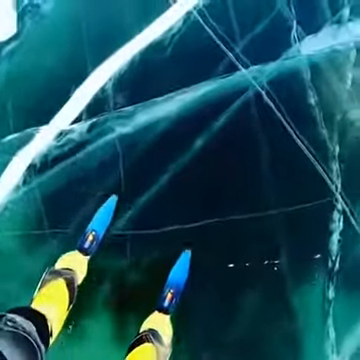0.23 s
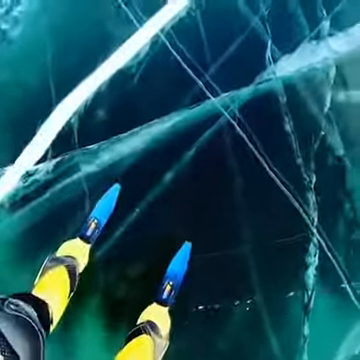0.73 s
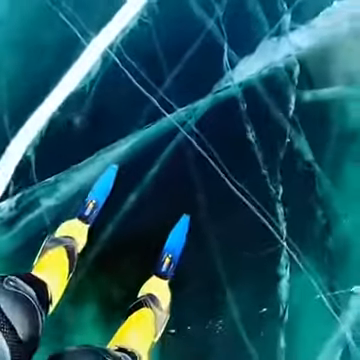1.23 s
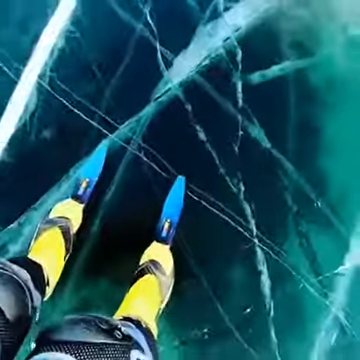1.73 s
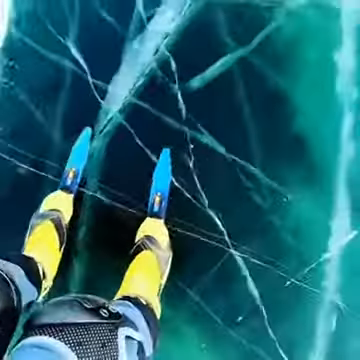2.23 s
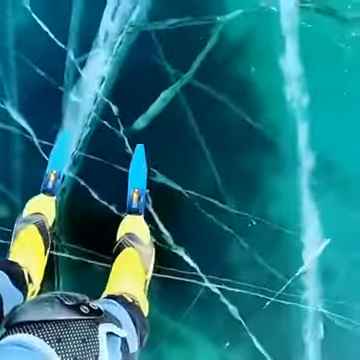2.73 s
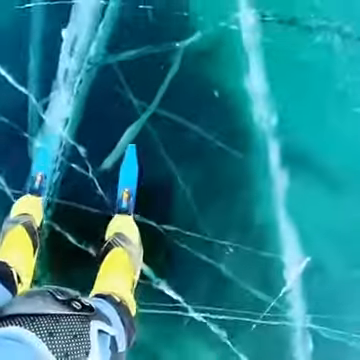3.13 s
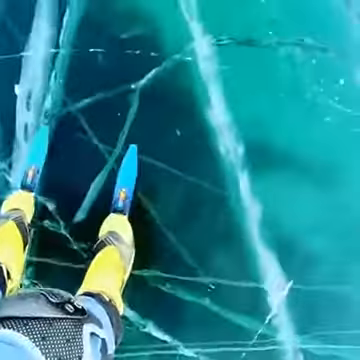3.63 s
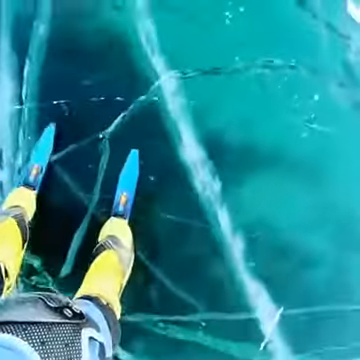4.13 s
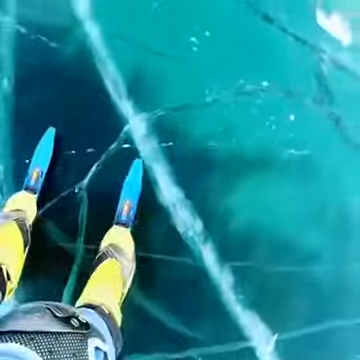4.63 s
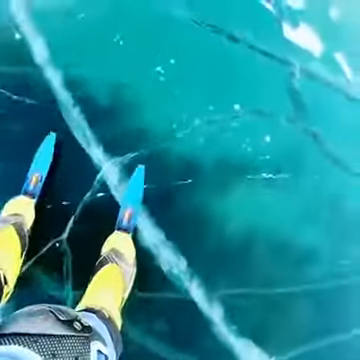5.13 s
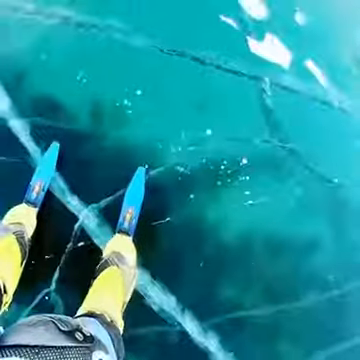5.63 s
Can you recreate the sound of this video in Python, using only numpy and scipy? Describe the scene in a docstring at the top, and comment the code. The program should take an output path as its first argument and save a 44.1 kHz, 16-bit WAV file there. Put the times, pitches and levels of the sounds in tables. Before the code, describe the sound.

Skate blades glide softly over clear lake ice as small cracks tick, then big sharp fractures burst with dull rushes and deep falling booms.

```python
"""Clear lake ice cracks under a skater who glides over it, slowly losing speed.
Each fracture arrives twice: as a dull rush through the ice sheet, then as a sharp crackle through the air.
The farther off it is, the earlier, duller and longer the rush; filtered noise and clicks make both.
Bending waves spread out in the sheet and arrive as falling tones, made by sweeping sines.
Noise makes the blades' hiss and rumble and the air at the microphone; bright, short cracks tick."""
import sys
import numpy as np
from scipy import signal
from scipy.fft import rfft, irfft, next_fast_len
from scipy.io import wavfile

SR = 44100
rng = np.random.default_rng(int(sys.argv[2]) if len(sys.argv) > 2 else 0)


def pcm_store(signal):
    """Save signal as 16-bit PCM."""
    levels = np.round(np.clip(np.atleast_2d(signal), -1, 1) * 32767)
    wavfile.write(sys.argv[1], SR, levels.astype(np.int16).T)


N = 258867  # samples
T = np.arange(N) / SR  # time in seconds


def from_db(db):
    """Level law: 20 dB is a factor of ten in amplitude."""
    return 10 ** (np.asarray(db) / 20)


def rms_one(x):
    """Normalization: scale to unit mean power."""
    return x / np.sqrt(np.mean(x ** 2) + 1e-20)


def at_hz(points, hz):
    """Logarithmic pitch scale: interpolate a table over the log of frequency."""
    table_hz, values = np.array(points).T
    return np.interp(np.log(hz + 1e-3), np.log(table_hz), values)


def panned(pan_db):
    """Level difference between channels: gains for left and right, positive toward the left."""
    return from_db(np.array([[.5], [-.5]]) * pan_db)


def stereo_noise(alike, size=N):
    """Partial coherence: a shared and an opposed white noise set how alike the channels are."""
    mid, side = rng.standard_normal((2, size))
    alike = np.clip(alike, -1, 1)
    opposed = side * [[1], [-1]]
    return (np.sqrt(1 + alike) * mid + np.sqrt(1 - alike) * opposed) / np.sqrt(2)


def coloured(x, spectrum):
    """Spectral shaping: give white sound a smooth spectrum and keep its power."""
    size = next_fast_len(N + 4096)
    hz = np.arange(size // 2 + 1) * SR / size
    gain = rms_one(from_db(at_hz(spectrum, hz)))
    return irfft(rfft(x, size) * gain, size)[..., :N]


def uneven(x, ripple_db, spacing_hz):
    """Interference: random narrow peaks and dips, as short paths in the ice add up and cancel."""
    length = x.shape[-1]
    size = next_fast_len(length + 2048)
    place = np.arange(size // 2 + 1) * SR / size / spacing_hz
    heights = np.clip(rng.standard_normal(2000), -1.7, 1.7)
    ripple = np.interp(place, np.arange(2000), heights)
    gain = rms_one(from_db(ripple_db * ripple))
    return irfft(rfft(x, size) * gain, size)[..., :length]


def drift(rate):
    """Slow random modulation: about rate new values a second, joined by lines, unit power."""
    return rms_one(np.interp(T * rate, np.arange(N), rng.standard_normal(N)))


def filtered(x, hz, kind, order=2):
    """Butterworth filtering: a maximally flat pass band."""
    sos = signal.butter(order, np.clip(hz, 10, .45 * SR), kind, fs=SR, output="sos")
    return signal.sosfilt(sos, x)


def echoed(x, delay_s, echo_db):
    """Reflection: add one delayed copy."""
    delayed = np.array([np.interp(T - delay_s, T, side, left=0) for side in x])
    return x + from_db(echo_db) * delayed


def splinters(per_s, size_db):
    """Impulsive noise: sparse clicks of uneven size and either sign, with unit power."""
    signs = rng.choice([-1, 1], N)
    sizes = from_db(size_db * np.minimum(rng.exponential(1, N), 3))
    return rms_one(sizes * signs * (rng.random(N) < per_s / SR))


# Spectrum of the air at the microphone. Each row: frequency in Hz, relative density in dB per Hz.
WIND_SPECTRUM = [(15, 4), (30, 8), (50, -1.5), (90, -4.5), (160, -21), (400, -35)]


def wind(start_db=-45.0, fall_db_per_s=2.02, pan_db=0.94):
    """Turbulence: the air of the glide buffets the microphone, less as the glide slows."""
    level = from_db(start_db - fall_db_per_s * T)
    return level * panned(pan_db) * coloured(stereo_noise(1.0), WIND_SPECTRUM)


# Spectrum of the rumbling ice. Each row: frequency in Hz, relative density in dB per Hz.
RUMBLE_SPECTRUM = [(60, 4.5), (130, 6.5), (220, 3), (380, 4), (550, -2.5), (800, -10.5), (1200, -22.5),
                   (2500, -44)]


def blade_rumble(start_db=-53.0, fall_db_per_s=0.73):
    """Forced vibration: the blades set the ice rumbling, less as the glide slows."""
    level = from_db(start_db - fall_db_per_s * T)
    return level * coloured(stereo_noise(0.45), RUMBLE_SPECTRUM)


# Spectrum of the shaved grit. Each row: frequency in Hz, relative density in dB per Hz.
HISS_SPECTRUM = [(700, -25), (1200, -3.5), (2000, -1), (3200, 0.5), (5500, -4), (8000, -3), (10500, -4.5),
                 (12000, -2.5), (13500, -57)]
# Hiss before and after the big fractures. Each row: time in seconds, relative level in dB.
HISS_BEFORE = [(0.0, -57.5), (0.3, -70), (0.67, -67), (1.54, -67.5), (2.0, -57), (2.35, -62.5)]
HISS_AFTER = [(3.4, -55), (3.89, -68), (4.52, -61.5), (4.84, -66), (5.32, -60.5), (5.44, -56),
              (5.87, -58.5)]


def blade_hiss(hiss_db=-1.0, grit_db=-6, chatter_db=3.5, pan_db=1.0, chips_per_s=16, chip_db=3.5, chip_s=0.011):
    """Friction noise: the blades shave fine grit and catch on small chips."""
    level_db = hiss_db + np.interp(T, *np.vstack([HISS_BEFORE, HISS_AFTER]).T)
    catches = rng.random(N) * (rng.random(N) < chips_per_s / SR)
    # each catch dies away exponentially; the tiny offset keeps the filter off denormal numbers
    chips = signal.lfilter([1], [1, -np.exp(-1 / (chip_s * SR))], catches + 1e-18)
    bite = from_db(chatter_db * drift(40)) + from_db(chip_db) * chips
    grains = stereo_noise(0.86) + from_db(grit_db) * splinters(per_s=550, size_db=2.0)
    grit = coloured(rms_one(grains * bite), HISS_SPECTRUM)
    return from_db(level_db) * panned(pan_db) * uneven(grit, ripple_db=2.0, spacing_hz=130)


# Thin tone of a far fracture. The row: start in seconds, pitch times age in cycles, width in octaves.
WHISTLE = (1.459, 93.5, .48)


def whistle(db=-60, loudest_hz=1020):
    """Dispersion: a far blow spreads into a thin tone whose pitch falls inversely with its age."""
    start, cycles, width_octaves = WHISTLE
    hz = cycles / np.maximum(T - start, .01)
    octaves_off = np.log2(hz / loudest_hz)
    level = from_db(db) * np.exp(-.5 * (octaves_off / width_octaves) ** 2)
    return level * np.sqrt(2) * np.sin(2 * np.pi * np.cumsum(hz) / SR)


def sheet_shudder(start_s=2.42, crest_s=2.57, db=-40, fall_db_per_s=17, band_hz=(35, 210)):
    """Free vibration: the whole sheet keeps shuddering after the big fracture and slowly dies away."""
    swell = np.clip((T - start_s) / (crest_s - start_s), 0, 1)
    level = swell * from_db(db - fall_db_per_s * np.maximum(T - crest_s, 0))
    return level * rms_one(filtered(stereo_noise(0.45), band_hz, "band"))


# Bending waves of the biggest fractures.
# Each row: start in seconds, relative level in dB, hold in seconds, fade after the hold in dB per second.
BOOMS = [(2.602, -31, 0.49, 25), (3.171, -42.5, .05, 110)]
BOOM_START_HZ, BOOM_END_HZ, BOOM_FALL_S, BOOM_ATTACK_S = 359.3, 24.5, .102, 0.023
BOOM_LOSS_DB_PER_OCTAVE = 0.7


def boom(pan_db=3.5, gain_db=2.0, waver_db=3.0, shared_scatter=0.41, own_scatter=0.26):
    """Dispersion: lower bending waves travel slower, so one blow arrives as a falling, scattered tone."""
    out = np.zeros((2, N))
    for s, db, hold_s, fade_db_per_s in BOOMS:
        age = np.maximum(T - s, 0)
        hz = BOOM_END_HZ + (BOOM_START_HZ - BOOM_END_HZ) * np.exp(-age / BOOM_FALL_S)
        phase = 2 * np.pi * np.cumsum(hz) / SR
        loss_db = BOOM_LOSS_DB_PER_OCTAVE * np.log2(BOOM_START_HZ / hz)
        loss_db = loss_db + fade_db_per_s * np.maximum(age - hold_s, 0)
        attack = np.minimum(age / BOOM_ATTACK_S, 1)
        level = attack * from_db(db - loss_db + waver_db * drift(35))
        # waves by other paths beat with the direct one, partly differently in each channel
        shared, left, right = [drift(55) * np.cos(phase) + drift(55) * np.sin(phase) for path in range(3)]
        scatter = shared_scatter * shared + own_scatter * np.array([left, right])
        out += level * (np.sin(phase) + scatter)
    return from_db(gain_db) * panned(pan_db) * out


# Hard knocks as a near fracture opens. Each row: time in seconds, relative peak level in dB.
KNOCKS = [(1.2194, -18), (1.2232, -18), (2.7752, -16), (2.783, -12.5), (4.5231, -39), (5.2658, -35)]


def knocks(band_hz=(900, 2200), pan_db=-6.5):
    """Impulse response: each jump of a near fracture sends one short pulse through the ice."""
    clicks = np.zeros(N)
    for s, db in KNOCKS:
        clicks[round(s * SR)] = from_db(db)
    pulse = filtered(signal.unit_impulse(512), band_hz, "band", order=4)
    pulse = pulse / np.abs(pulse).max()
    train = signal.oaconvolve(clicks, pulse)[None, :N]
    return panned(pan_db) * echoed(train, delay_s=0.00165, echo_db=-0.5)


# Resonances of the sheet. Each row: frequency in Hz, width in Hz, relative level in dB.
SHEET_MODES = [(891, 23, 3), (1078, 32.4, -13), (1300, 14, -6), (1320, 10, -9.5), (1594, 79, 3.5),
               (1770, 5.9, 9), (1980, 25.5, -38), (2264, 36, 10.5)]


def ringing(x, ring_db=-6.0, direct_db=0.5):
    """Resonance: the sheet lets a few narrow modes ring on beside the direct sound."""
    out = from_db(direct_db) * x
    for hz, width_hz, db in SHEET_MODES:
        mode = signal.lfilter(*signal.iirpeak(hz, hz / width_hz, fs=SR), x)
        out = out + from_db(db + ring_db) * mode
    return out


# Fractures through the sheet, for both the rush and the crackle.
# Each row: arrival by air in seconds, relative crackle level in dB, treble gain above 7 kHz in dB,
# lead of the rush in seconds, relative rush level in dB.
FRACTURES = [(0.628, -40.5, -11.5, 0.041, -54), (0.842, -41, -1, 0.08, -48), (1.225, -25, 6, 0.02, -30.5),
             (1.967, -36.5, -24, 0.2, -34), (2.46, -28.5, -5, 0.092, -30), (2.579, -19.5, -6, 0.083, -22.5),
             (2.785, -21.5, 1.5, 0.029, -27), (3.122, -26.5, -7.5, 0.084, -26),
             (3.549, -41.5, -8, 0.017, -57), (3.962, -45.5, -9, 0.057, -56.5), (4.351, -41, 4, .023, -56),
             (4.517, -41.5, -6, 0.037, -40.5), (5.27, -29, -6, 0.043, -34.5)]
# the rush at a typical lead; a longer lead lowers its upper edge and lengthens its decay by these powers
TYPICAL_LEAD_S = .045
RUSH_EDGE_HZ, RUSH_DULLING, RUSH_MAX_EDGE_HZ = 1390, 0.76, 2500
RUSH_T60_S, RUSH_LENGTHENING = 0.44, 0.38  # decay by 60 dB, at 1 kHz
RUSH_CREST_SHARE = 0.93  # the upper edge is highest after this share of the lead


def rushes():
    """Time of flight: the lead tells the distance; rows of first arrival, height, dB, edge Hz, t60 s."""
    rows = []
    for s, db, treble_db, lead, rush_db in FRACTURES:
        first = s - lead
        height = first + RUSH_CREST_SHARE * lead
        distance = max(lead, .001) / TYPICAL_LEAD_S
        edge_hz = min(RUSH_EDGE_HZ / distance ** RUSH_DULLING, RUSH_MAX_EDGE_HZ)
        t60 = RUSH_T60_S * distance ** RUSH_LENGTHENING
        rows.append((first, height, rush_db, edge_hz, t60))
    return rows


# Spectrum of the sheet. Each row: frequency in Hz, relative level in dB.
SHEET_SPECTRUM = [(60, -6.5), (150, -10.5), (350, -2.5), (700, -2.5), (1300, 0.5), (4000, -4.5)]
# Balance of the sheet. Each row: frequency in Hz, left minus right in dB.
SHEET_PAN = [(100, 0), (300, 0), (550, -4.5), (1000, -5), (1800, -1.5), (3000, 5.5)]
# Coherence of the channels. Each row: frequency in Hz, likeness from 0 to 1.
SHEET_LIKENESS = [(100, 1), (400, 0.66), (1000, 0.84), (2000, 0.5), (3000, 0.3)]


def sheet_rush(climb_db=13, lag_cycles=2.5, low_linger=0.77, first_edge=0.64, front_s=0.0024,
               grain_db=1.0, gain_db=-7):
    """Fast waves in ice: they outrun the air and brighten as they swell; lows crest later, ring longer."""
    out = np.zeros((2, N))
    band_edges = 70 * 2 ** (np.arange(16) * .4)
    t = T[::16]  # a coarse time grid suffices for the levels
    for low, high in zip(band_edges, band_edges[1:]):
        hz = np.sqrt(low * high)
        khz = hz / 1000
        power = 0
        for first, height, db, edge_hz, t60 in rushes():
            crest = height + lag_cycles * max(1 / hz - 1 / edge_hz, 0)
            rising_db = climb_db * np.minimum(t - crest, 0) / max(crest - first, front_s)
            dying_db = -60 * np.maximum(t - crest, 0) / t60 * khz ** low_linger
            front = np.clip((t - first) / front_s, 0, 1)
            edge = edge_hz * np.interp(t, [first, height], [first_edge, 1])
            dulling = 1 / (1 + (hz / edge) ** 5)
            power = power + (front * from_db(db + rising_db + dying_db) * dulling) ** 2
        noise = stereo_noise(at_hz(SHEET_LIKENESS, hz))
        band = rms_one(filtered(noise, [low, high], "band", order=4))
        # wider bands at higher pitch carry more power
        level = np.interp(T, t, np.sqrt(power * khz)) * from_db(at_hz(SHEET_SPECTRUM, hz))
        out += band * level * panned(at_hz(SHEET_PAN, hz))
    return out * from_db(gain_db + grain_db * drift(400))


FRACTURE_T60_S = 0.19
# Shallow splits, dull and heard through the air alone.
# Each row: time in seconds, relative level in dB, decay by 60 dB in seconds.
SPLITS = [(0.054, -42.5, 0.23), (.445, -50.5, 0.09), (0.513, -51.5, 0.13), (.778, -52.5, 0.1),
          (1.712, -57.5, 0.22), (1.749, -51.5, 0.16), (2.77, -19.5, 0.032), (3.094, -44.5, 0.14),
          (3.402, -42.5, 0.12), (3.643, -50, 0.14), (4.008, -53, 0.22), (4.196, -51, 0.032),
          (4.693, -52, 0.095), (4.735, -52, 0.14), (5.049, -54, 0.14), (5.366, -54, .5)]
SPLIT_TREBLE_DB = -15
# Bright ticks of ice flakes breaking at the blades. Each row: time in seconds, relative level in dB.
TICKS = [(0.133, -53), (.199, -52), (0.897, -50), (0.967, -56.5), (1.766, -48.5), (1.927, -52),
         (2.170, -51), (4.919, -61)]
TICK_T60_S, TICK_TREBLE_DB = 0.017, 18.5


def air_cracks():
    """Airborne sound: all that crackles, as rows of time s, relative dB, decay t60 s, treble dB."""
    fractures = [(s, db, FRACTURE_T60_S, treble_db) for s, db, treble_db, lead, rush_db in FRACTURES]
    splits = [(s, db, t60, SPLIT_TREBLE_DB) for s, db, t60 in SPLITS]
    ticks = [(s, db, TICK_T60_S, TICK_TREBLE_DB) for s, db in TICKS]
    return fractures + splits + ticks


def first_snaps(after_s=0.0045, size_db=16):
    """Sudden release: the largest jump of each crack comes just after it opens."""
    clicks = np.zeros(N)
    times = np.array(air_cracks())[:, 0] + after_s
    clicks[np.round(times * SR).astype(int)] = from_db(size_db)
    return clicks


# Spectrum of the crackle. Each row: frequency in Hz, relative density in dB per Hz.
CRACKLE_SPECTRUM = [(300, -12), (900, -8), (2000, 1.5), (3200, -0.5), (5500, -3.5), (8000, -6),
                    (12500, -11)]
# dull cracks lie to the left; the bright ones, close underfoot, are nearer the middle
CRACK_PAN_DB, PAN_PER_TREBLE = 2.5, -0.19


def crackle(rise_s=0.0022, tail_db=-17, tail_stretch=2.15, splinter_db=1.5, snap_db=-3.0, snap_s=0.00092,
            alike=0.86, treble_hz=7000, creep_db=-19, creep_s=0.0097, gain_db=-3.5):
    """Brittle fracture in tiny jumps: it creeps, snaps, splinters densely, then scatters from farther along."""
    grains = stereo_noise(alike) + from_db(splinter_db) * splinters(per_s=1200, size_db=1.5) + first_snaps()
    grains = coloured(grains, CRACKLE_SPECTRUM)
    lowpass = signal.butter(3, min(treble_hz, SR / 3), fs=SR, output="sos")
    body = signal.sosfiltfilt(lowpass, grains)
    out = np.zeros((2, N))
    for s, db, t60, treble_db in air_cracks():
        span = slice(max(int((s - .04) * SR), 0), int((s + .5) * SR))
        age = np.maximum(T[span] - s, 0)
        burst = from_db(-60 * age / t60)
        snap = from_db(snap_db) * np.exp(-age / snap_s)
        scatter = from_db(tail_db) * burst ** (1 / tail_stretch)
        creep = from_db(creep_db) * np.exp(-np.abs(T[span] - s) / creep_s)
        rise = 1 - np.exp(-age / rise_s)
        level = creep + rise * np.sqrt(snap ** 2 + burst ** 2 + scatter ** 2)
        treble = grains[:, span] - body[:, span]
        colour = uneven(body[:, span] + from_db(treble_db) * treble, ripple_db=3.2, spacing_hz=170)
        pan = panned(CRACK_PAN_DB + PAN_PER_TREBLE * treble_db)
        out[:, span] += from_db(db + gain_db) * level * pan * colour
    return out


def scene():
    """Free field: the surface gives the cracks one short echo, and there are no walls to answer."""
    blades = wind() + blade_rumble() + blade_hiss()
    bending = whistle() + sheet_shudder() + boom()
    through_ice = ringing(sheet_rush() + knocks())
    through_air = echoed(crackle(), delay_s=0.0047, echo_db=-17.0)
    return blades + bending + through_ice + through_air


TOP_HZ, CUTOFF_HZ = 13100, 15500


def record(dry, top_db=-72):
    """Band limiting: the treble drops off steeply, with only a faint hiss above it, itself cut off."""
    treble_cut = signal.ellip(10, .3, 70, TOP_HZ, fs=SR, output="sos")
    final_cut = signal.ellip(10, .3, 80, CUTOFF_HZ, fs=SR, output="sos")
    faint_hiss = from_db(top_db) * filtered(stereo_noise(1.0), TOP_HZ, "high", order=8)
    return signal.sosfilt(final_cut, signal.sosfilt(treble_cut, dry) + faint_hiss)


dry = scene()
out = record(dry)
pcm_store(out)
```